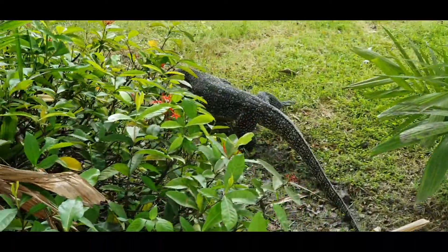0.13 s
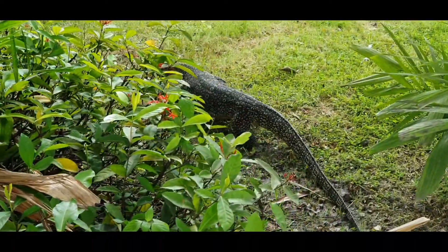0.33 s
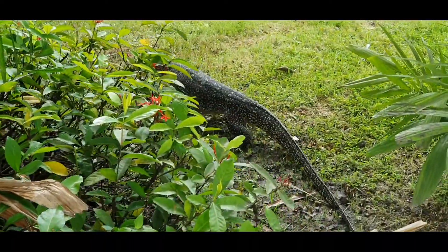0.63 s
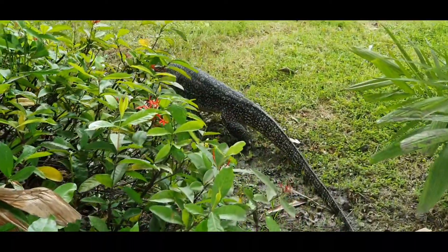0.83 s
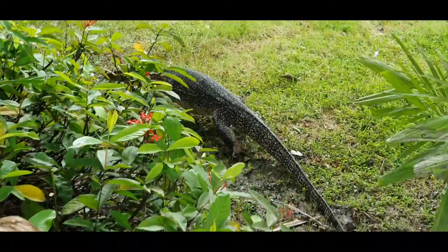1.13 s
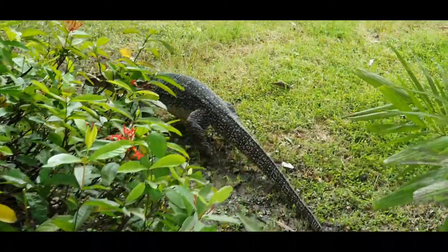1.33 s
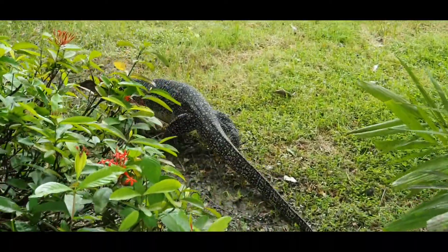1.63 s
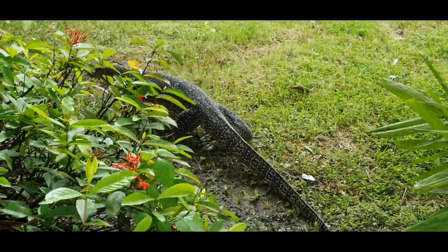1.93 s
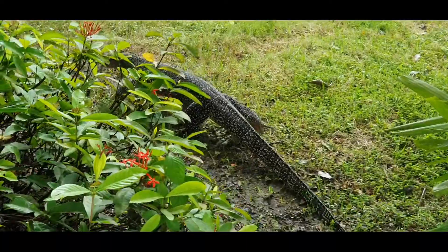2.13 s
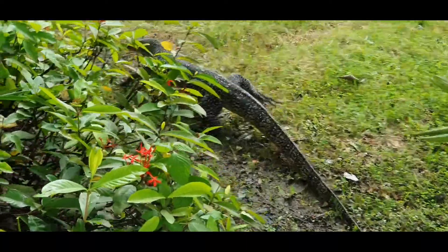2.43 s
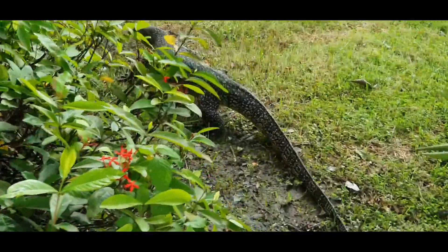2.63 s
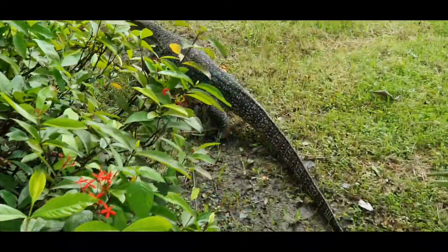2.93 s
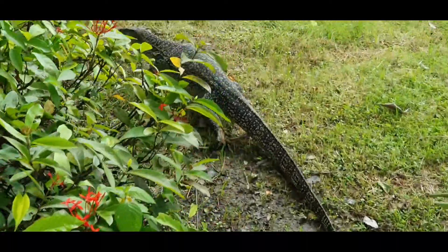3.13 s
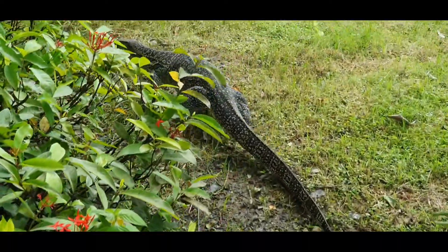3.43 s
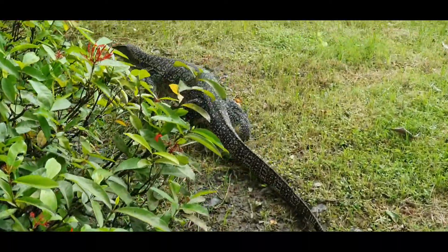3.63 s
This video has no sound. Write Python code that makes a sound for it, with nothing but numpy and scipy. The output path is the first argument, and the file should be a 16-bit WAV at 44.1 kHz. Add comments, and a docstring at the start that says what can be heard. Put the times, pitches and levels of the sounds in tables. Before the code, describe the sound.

Leaves rustle and dry twigs snap close by, strongest just after one second and again near two and a half, then fade to soft brushing; a deep wavering traffic rumble lies behind, picked up outdoors by a phone.

```python
"""A large lizard pushes through a low shrub: leaves brush and crackle, dry twigs snap, short narrow hisses rise.
Shaped noise and sparse clicks make the leaves, impulses with damped rings the twigs, gliding noise bands the hisses.
Far traffic rumbles as partly coherent noise, with a wavering boom (one gliding sine)
and an idling engine (a few harmonic orders). Two phone microphone ports each add their own colour."""
import sys
import numpy as np
from scipy import signal
from scipy.io import wavfile
from scipy.ndimage import uniform_filter1d

SR = 44100
rng = np.random.default_rng(int(sys.argv[2]) if len(sys.argv) > 2 else 0)


def nominal_scale(level):
    """Amplitude ratio for a level in decibels (scalar or array-like)."""
    x = np.asarray(level, float) / 20
    return 10 ** x


def persist_wave(psi):
    """Save psi, clipped to +-1, as 16-bit WAV."""
    counts = np.round(np.clip(psi, -1, 1) * 32767).astype(np.int16)
    wavfile.write(sys.argv[1], SR, np.atleast_2d(counts).T)


N = 166257
BINS_HZ = np.fft.rfftfreq(2048, 1 / SR)

# Spectral colour of leaf noise: (frequency [Hz], relative level [dB])
LEAF_COLOUR = [(500, -35), (1500, -5), (2500, -4.5), (3300, -1.5), (4500, -3.5), (7000, -1.5),
               (11000, -1.5), (16000, -0.5)]
LEAF_SAME = 0.13  # share of leaf noise power common to both channels


def evened(x):
    """Normalizes a signal to a root-mean-square value of 1."""
    return x / np.sqrt(np.mean(x ** 2) + 1e-20)


def read(points, hz):
    """Interpolates a spectrum linearly over logarithmic frequency, close to the ear's pitch scale."""
    f, value = np.transpose(points)
    return np.interp(np.log(hz + 1), np.log(f + 1), value)


def curve(table, column):
    """Interpolates one column of a time table linearly, giving a value at every sample."""
    rows = np.array(table)
    return np.interp(np.arange(N) / SR, rows[:, 0], rows[:, column])


def add(mix, s, sound):
    """Superposes a two-channel sound on the mix from time s [s]."""
    part = mix[:, round(s * SR):][:, :sound.shape[1]]
    part += sound[:, :part.shape[1]]


def slow(rate_hz):
    """Low-pass random fluctuation of rms 1: white noise averaged twice over 1 / rate_hz."""
    width = max(int(SR / rate_hz), 1)
    smoothed = uniform_filter1d(rng.standard_normal(N), width)
    return evened(uniform_filter1d(smoothed, width))


def causal(db):
    """Minimum-phase impulse response: the Hilbert transform of log gain [1025 bins, dB] gives the phase."""
    log_gain = np.log(nominal_scale(np.concatenate([db, db[-2:0:-1]])))
    return np.fft.ifft(np.exp(np.conj(signal.hilbert(log_gain)))).real[:1024]


def traffic():
    """Diffuse field: noise whose coherence between channels depends on frequency, right channel leading."""
    # Road noise spectrum: (frequency [Hz], relative level [dB])
    road_colour = [(20, -21), (32, -19), (48, -16), (66, 1), (100, -5), (150, -9.5), (200, -12),
                   (300, -21.5), (500, -28.5), (900, -23), (1300, -29.5), (2400, -35), (3200, -42),
                   (8000, -48), (16000, -55)]
    # Coherence between the channels: (frequency [Hz], likeness [0 to 1])
    coherence = [(60, 1), (150, 1), (400, 0.93), (800, 0.98), (1500, 0.067), (4000, 0.1), (16000, 0.52)]
    # Course of the roar in the middle hump of the spectrum: (time [s], relative level [dB])
    roar_course = [(0, -51), (.9, -53), (1.35, -47.5), (2, -54.5), (2.5, -52), (3.77, -52)]
    rumble_over_roar_db, lag_s, patchy_db = 19.5, 0.00024, 0.9

    frames = N // 512 + 5
    a, b, c, d, patches = rng.standard_normal((frames, 1025, 5)).T
    patches = evened(uniform_filter1d(uniform_filter1d(patches, 16, 0), 6, 1))

    same = np.clip(read(coherence, BINS_HZ), 0, 1)[:, None]
    lag = np.exp(-2j * np.pi * BINS_HZ * lag_s)[:, None]
    right = a + 1j * b
    left = same * lag * right + np.sqrt(1 - same ** 2) * (c + 1j * d)

    roar_db = np.interp(np.arange(frames) * 512 / SR, *np.transpose(roar_course))
    # the lows follow the roar far less than the middle: (frequency [Hz], dB per dB)
    follows = read([(150, 0.034), (600, 0.46)], BINS_HZ)[:, None]
    swell_db = follows * (roar_db - roar_db.mean())
    colour_db = read(road_colour, BINS_HZ)[:, None]
    z = np.array([left, right]) * nominal_scale(colour_db + patchy_db * patches + swell_db)
    noise = signal.istft(z, nperseg=2048, noverlap=1536)[1][:, :N]
    return nominal_scale(roar_db.mean() + rumble_over_roar_db) * evened(noise)


def boom():
    """Frequency and amplitude modulation: a deep sine swells while its pitch wavers."""
    # Course of the tone: (time [s], mean frequency [Hz], mean rms level [dB])
    boom_course = [(0, 65.1, -39.5), (.3, 66.57, -35), (.52, 67.16, -33), (.68, 64.5, -34.5),
                   (.78, 59.4, -27), (.87, 62, -39.5), (.95, 63.8, -22.5), (1.05, 64.53, -57),
                   (1.4, 69.7, -33), (1.95, 63.96, -52), (2.15, 69.8, -28), (2.27, 63.53, -35.5),
                   (2.48, 63.85, -23.5), (2.67, 62.06, -54.5), (2.83, 65.04, -30.5), (2.93, 63.82, -29.5),
                   (3.2, 67.4, -34), (3.35, 67.73, -28), (3.72, 68.6, -27)]
    hz = curve(boom_course, column=1) * (1 + 0.013 * slow(rate_hz=6.6))
    level_db = curve(boom_course, column=2) + 0.15 * slow(rate_hz=3.6)
    return np.sqrt(2) * nominal_scale(level_db) * np.sin(2 * np.pi * np.cumsum(hz) / SR)


def idle():
    """Harmonic orders of a far engine, each fading on its own, phase-blurred by the air on the way."""
    # Course of the engine: (time [s], relative level [dB])
    idle_course = [(0, -76), (.45, -37), (.7, -34.5), (1.4, -28.5), (1.8, -39.5), (2.3, -37.5),
                   (2.7, -38.5), (3.1, -36), (3.6, -36.5)]
    # Engine orders: (multiple of the base frequency, relative level [dB])
    engine_orders = [(3, -4), (4, -11), (9.5, -26.5)]
    base_hz, blur_turns = 41.98, 0.051
    turns = base_hz * np.arange(N) / SR + blur_turns * slow(rate_hz=8.0)
    tones = np.zeros(N)
    for order, db in engine_orders:
        fading = nominal_scale(db + 0.9 * slow(rate_hz=1.3))
        tones += fading * np.sin(2 * np.pi * (order * turns + rng.random()))
    return np.sqrt(2) * nominal_scale(curve(idle_course, column=1)) * tones


def stroke(start, length, rise_s, fall_s):
    """Amplitude envelope: linear rise, hold sagging by 3 dB, exponential release."""
    t = np.arange(N) / SR - start
    sag = nominal_scale(-3 * np.clip(t / length, 0, 1))
    return np.clip(t / rise_s, 0, 1) * sag * np.exp(-np.maximum(t - length, 0) / fall_s)


def narrow_hiss(start, length, db, start_hz):
    """Quadrature modulation: low-pass noise on a rising carrier gives a narrow band of hiss."""
    glide_hz_per_s, pole_width_hz = 3200, 700
    hz = start_hz + glide_hz_per_s * (np.arange(N) / SR - start)
    r = np.exp(-np.pi * pole_width_hz / SR)
    wander = signal.lfilter([1], [1, -2 * r, r * r], rng.standard_normal((2, N)))
    turn = 2 * np.pi * np.cumsum(hz) / SR
    hiss = evened(wander[0] * np.cos(turn) + wander[1] * np.sin(turn))
    return nominal_scale(db) * stroke(start, length, rise_s=0.002, fall_s=0.008) * hiss


def shove(start, length, db):
    """Onset time grows as force falls: the gentler the shove below -43 dB, the slower it swells."""
    firm_db, slowing_db_per_db = -43, 2.2
    rise_s = 0.004 * nominal_scale(slowing_db_per_db * max(firm_db - db, 0))
    return nominal_scale(db) * stroke(start, length, rise_s, fall_s=0.025)


def brush():
    """Friction noise plus sparse random impulses: leaves slide (hiss) and crackle (clicks) under each shove."""
    # Shoves of the body through the leaves:
    # (start [s], length [s], level [dB], treble tilt about 6 kHz [dB per octave])
    shove_rows = [(0.043, 0.1, -43.5, -1.5), (0.351, 0.34, -49.5, -2), (0.969, 0.055, -43, -1),
                  (1.022, 0.03, -29.5, 0), (1.076, 0.095, -40, 0), (1.206, 0.048, -39.5, 2),
                  (1.264, 0.0084, -35, 8), (1.346, 0.12, -44.5, 4), (1.489, 0.12, -41.5, 1),
                  (1.615, 0.1, -52, 4.5), (1.733, 0.08, -43.5, 2), (1.847, 0.16, -48.5, -1.5),
                  (2.003, 0.2, -48.5, -2.5), (2.203, 0.23, -53, -0.5), (2.42, 0.028, -44, -2),
                  (2.446, 0.079, -34.5, -0.5), (2.56, 0.2, -49, -2.5), (2.674, 0.2, -44.5, -1.5),
                  (2.876, 0.29, -49, -3), (3.064, 0.26, -44, -2), (3.336, 0.2, -44, 0.5),
                  (3.644, 0.24, -47.5, -3.5)]
    crackle_per_s, crackle_spread_db, crackle_share = 1300, 4.5, 0.3  # share of the power
    clump_hz, clump_db, patchy_db = 90, 1.6, 2.13

    power = np.array([shove(start, length, db) ** 2 + 1e-14 for start, length, db, _ in shove_rows])
    # overlapping shoves blend their tilts by power
    tilt = np.array(shove_rows)[:, 3] @ power / power.sum(0)

    size_db = crackle_spread_db * np.minimum(rng.exponential(1, (3, N)), 4)
    size = nominal_scale(size_db) * rng.standard_normal((3, N))
    clicks = size * (rng.random((3, N)) < crackle_per_s / SR)
    hiss = rng.standard_normal((3, N))
    clump = nominal_scale(clump_db * slow(clump_hz))
    raw = clump * (np.sqrt(crackle_share) * evened(clicks) + np.sqrt(1 - crackle_share) * hiss)
    raw = np.sqrt(LEAF_SAME) * raw[2] + np.sqrt(1 - LEAF_SAME) * raw[:2]

    hz, t, z = signal.stft(raw, SR, nperseg=256)
    patches = rng.standard_normal(z.shape[1:][::-1]).T
    patches = evened(uniform_filter1d(uniform_filter1d(patches, 10, 0), 3, 1))
    slope_db = np.log2((hz[:, None] + 1) / 6000) * np.interp(t, np.arange(N) / SR, tilt)
    z = z * nominal_scale(read(LEAF_COLOUR, hz)[:, None] + slope_db + patchy_db * patches)
    return np.sqrt(power.sum(0)) * signal.istft(z, SR, nperseg=256)[1][:, :N]


def snap(s, db, ring_hz, chance):
    """Impulse excitation of a damped resonance: a crack, the leaf's ring and a scatter of small debris."""
    tick, crack_s, after_s, after_db = 3.2, 0.0005, 0.006, -16
    narrow_db, ring_width_hz, ring_share = 5, 150, 0.2  # narrow_db: fall per squared octave off the ring
    t = np.arange(chance.shape[1]) / SR
    noise = np.sqrt(LEAF_SAME) * chance[2] + np.sqrt(1 - LEAF_SAME) * chance[:2]
    decay = np.exp(-t / crack_s) + nominal_scale(after_db) * np.exp(-t / after_s)
    burst = (t == 0) * tick + noise * decay

    octaves_off = np.log2((BINS_HZ + 500) / ring_hz)
    colour = causal(read(LEAF_COLOUR, BINS_HZ) - narrow_db * octaves_off ** 2)
    crack = signal.fftconvolve(burst, colour[None], axes=1)[:, :len(t)]
    crack = crack / np.sqrt((crack[:, :40] ** 2).mean()) / 2  # set by the rms of its first 40 samples
    ring = np.exp(-np.pi * ring_width_hz * t) * np.sin(2 * np.pi * ring_hz * t)
    return s, nominal_scale(db) * ((1 - ring_share) * crack + ring_share * ring)


def scene():
    """Linear superposition of the shrub in front and the road far off."""
    # Snaps: (time [s], nominal level [dB], leaf ring frequency [Hz])
    snap_rows = [(0.0455, -32, 4170), (0.0538, -24.5, 2960), (0.9957, -26, 4500), (1.0067, -25, 4400),
                 (1.0154, -9, 4580), (1.0174, -11.5, 3440), (1.073, -22, 8040), (1.0845, -33, 5450),
                 (1.0976, -26, 4100), (1.117, -23.5, 4550), (1.1351, -19, 11200), (1.142, -27, 9000),
                 (1.150, -19.5, 10400), (1.2115, -26, 4740), (1.2223, -31, 4140), (1.2355, -18.5, 4560),
                 (1.258, -30, 4970), (1.2705, -16.5, 9900), (1.278, -23, 6200), (1.386, -30.5, 4230),
                 (1.398, -20, 8900), (1.418, -22, 5600), (1.498, -28, 5500), (1.513, -26.5, 2970),
                 (1.5656, -32, 3660), (1.7422, -32, 5540), (1.788, -30, 5000), (1.808, -35, 4800),
                 (1.94, -28.5, 6550), (2.0902, -32, 6927), (2.4484, -24.5, 5000), (2.4508, -24, 3800),
                 (2.4843, -24, 6000), (2.494, -27, 9300), (2.4998, -16.5, 5840), (2.6809, -27, 6840),
                 (2.811, -28.5, 6520), (3.1048, -32, 5487), (3.1595, -30, 5000), (3.277, -43, 6220),
                 (3.3485, -27, 5130), (3.367, -32, 4450), (3.683, -30, 4500)]
    # Short narrow hisses: a rising swish, ringing leaf flecks and the hissing tail of the loudest snap:
    # (start [s], length [s], level [dB], starting frequency [Hz])
    hiss_rows = [(0.603, 0.018, -46, 4650), (0.661, 0.18, -61.5, 4340), (1.026, 0.015, -43, 4900),
                 (1.032, 0.011, -44, 1850), (1.24, 0.0055, -52, 3350), (3.274, 0.01, -46.5, 6286),
                 (3.347, 0.028, -52.5, 6230)]
    twigs = np.zeros((2, N))
    for row, chance in zip(snap_rows, rng.standard_normal((len(snap_rows), 3, 3000))):
        add(twigs, *snap(*row, chance))
    hisses = sum(narrow_hiss(*row) for row in hiss_rows)
    return traffic() + boom() + idle() + hisses + brush() + twigs


def roll_off(x):
    """The treble ends steeply here."""
    return signal.sosfilt(signal.butter(12, 16520, fs=SR, output="sos"), x)


def record(dry):
    """Minimum-phase filtering: a low cut, then each port's own resonance and notch with an upper band edge."""
    # Responses of the left and right microphone ports: (frequency [Hz], gain [dB])
    left_port = [(30, -1.3), (300, -4), (1000, -6.5), (2400, -10.5), (4200, -10), (6500, -13), (7300, -20),
                 (8000, -7), (8800, -2), (10500, -5), (13000, -12), (15500, -14)]
    right_port = [(30, 0), (3000, 0), (4500, 4), (6600, 5), (7300, -1), (7900, -10), (9500, -8),
                  (11000, -4), (13000, -7), (15500, -5)]
    low_cut_hz, edge_hz, edge_width_hz, edge_db = 28.5, 15800, 250, -30
    upper_edge_db = edge_db * np.clip((BINS_HZ - edge_hz) / edge_width_hz, 0, 1)
    ports = np.array([causal(read(port, BINS_HZ) + upper_edge_db) for port in (left_port, right_port)])
    cut = signal.sosfilt(signal.butter(4, low_cut_hz, "high", fs=SR, output="sos"), dry)
    mix = signal.oaconvolve(cut, ports, axes=1)[:, :N]
    return roll_off(mix)


dry = scene()
out = record(dry)
persist_wave(out)
```